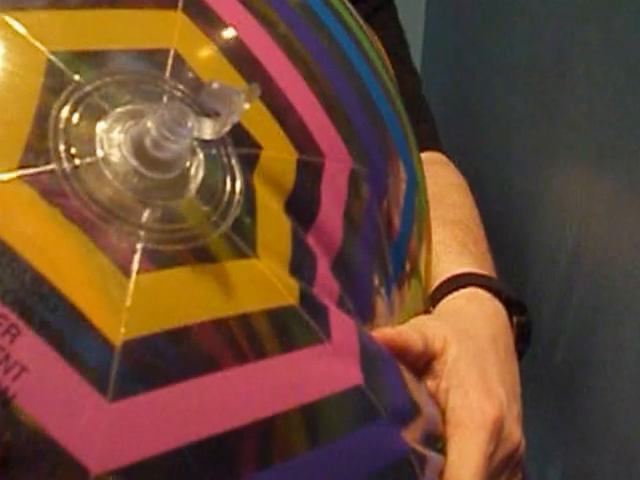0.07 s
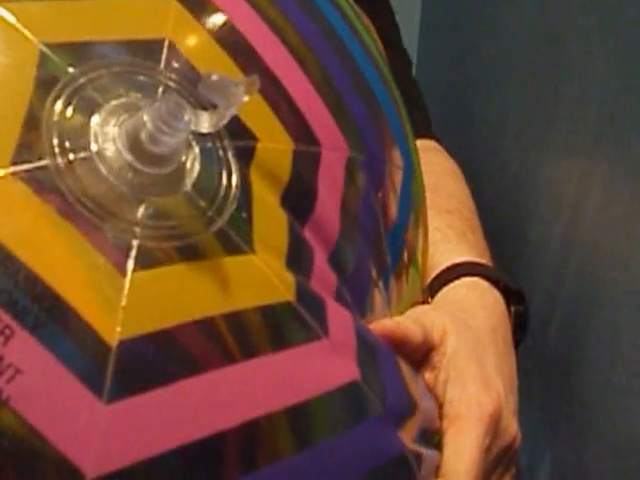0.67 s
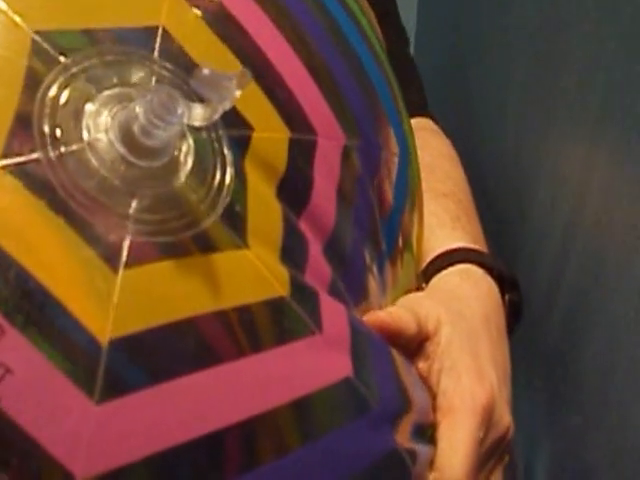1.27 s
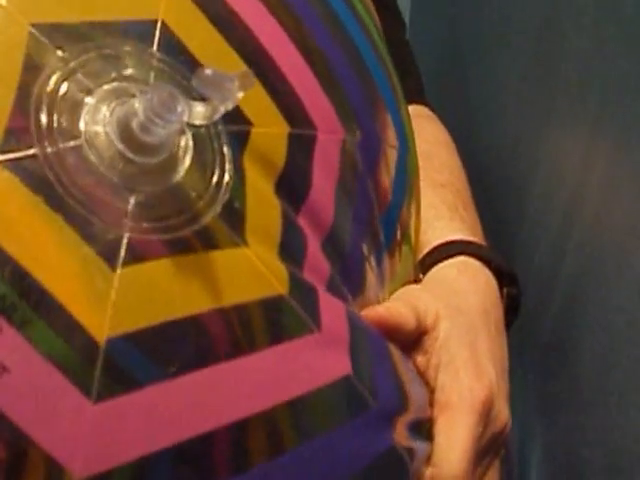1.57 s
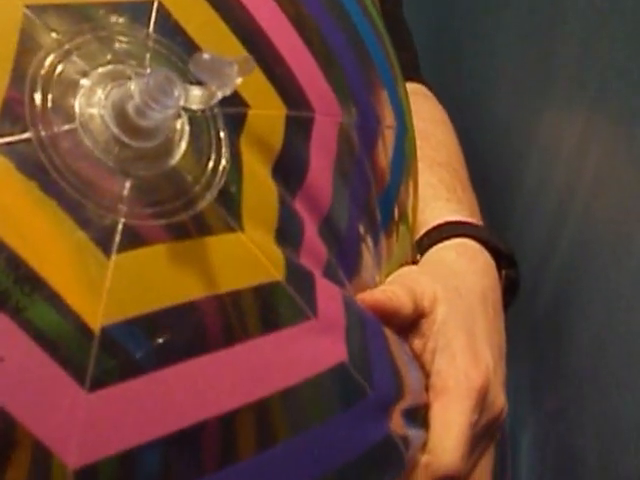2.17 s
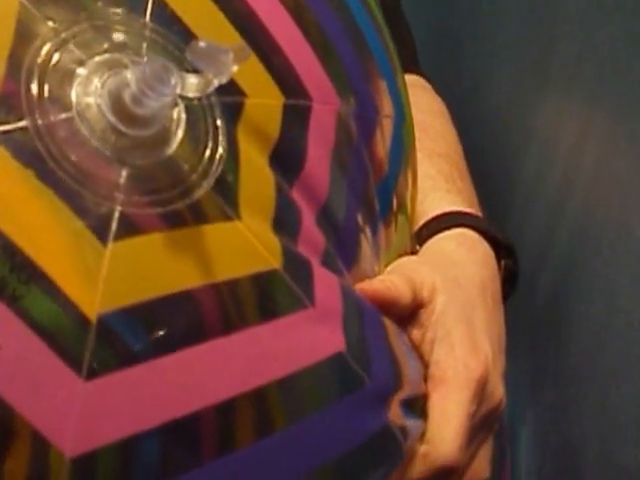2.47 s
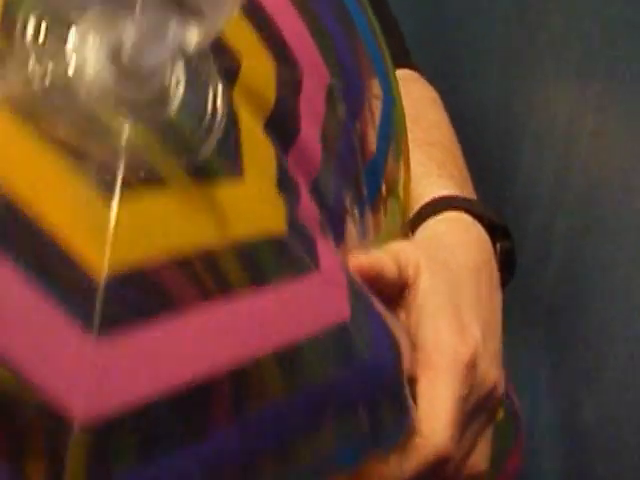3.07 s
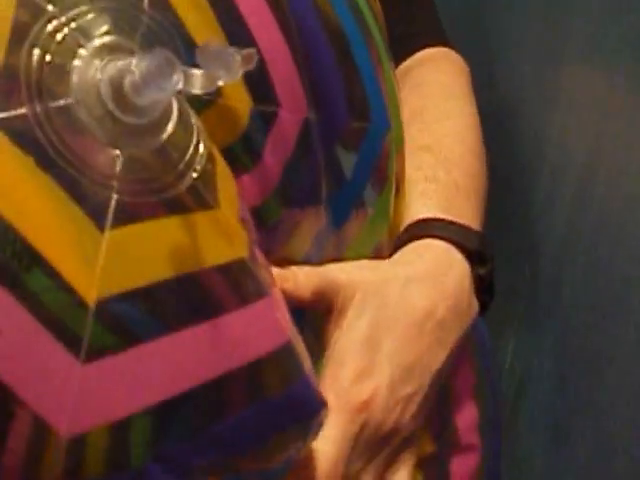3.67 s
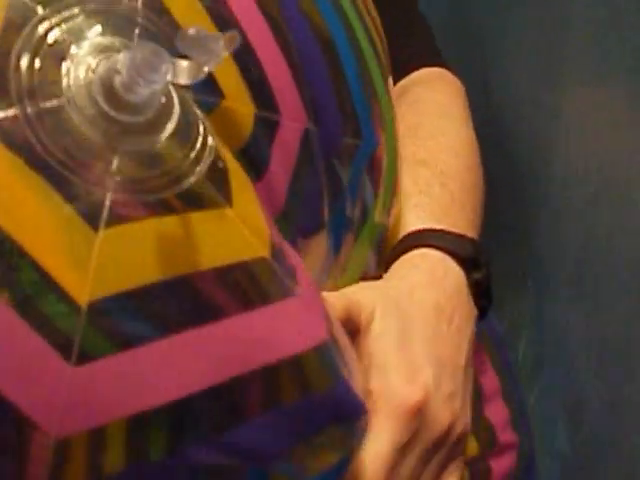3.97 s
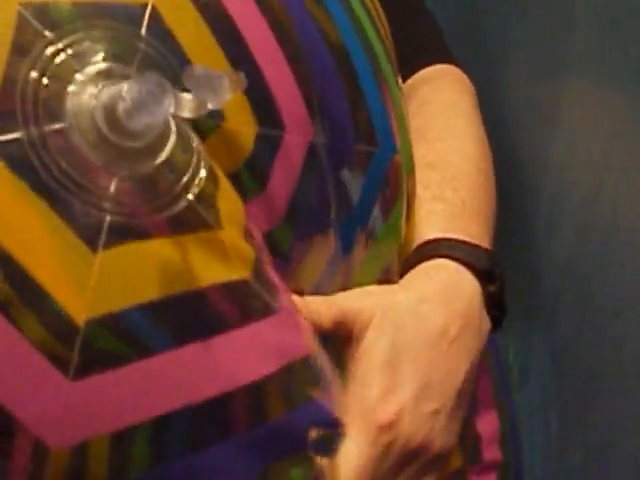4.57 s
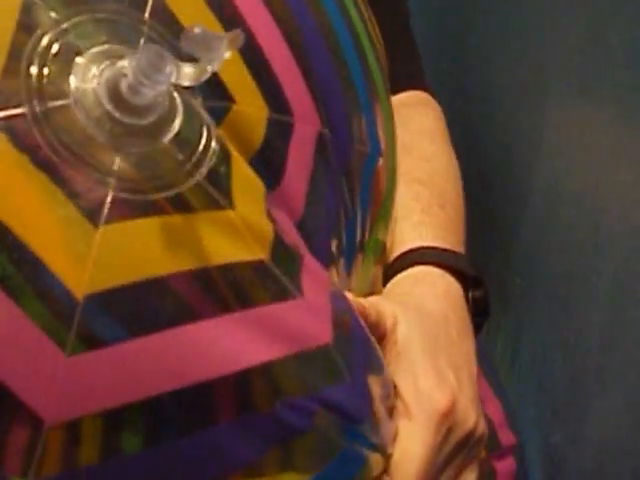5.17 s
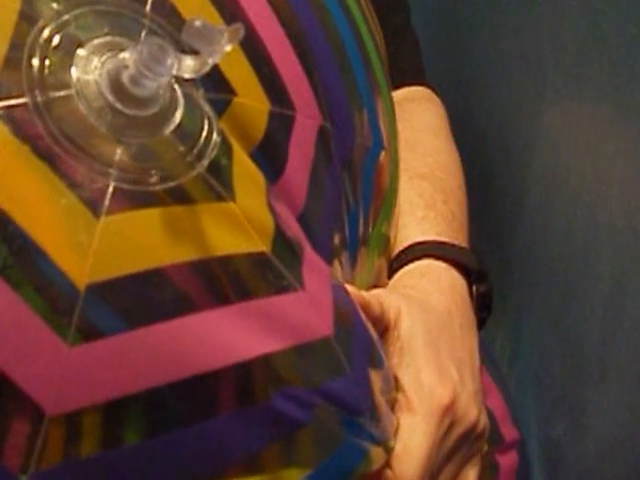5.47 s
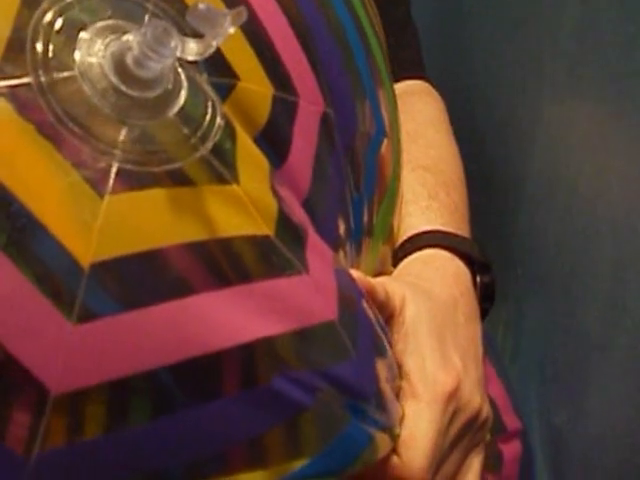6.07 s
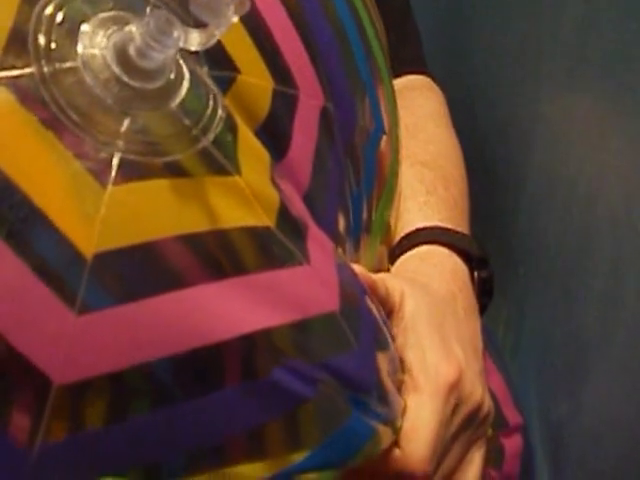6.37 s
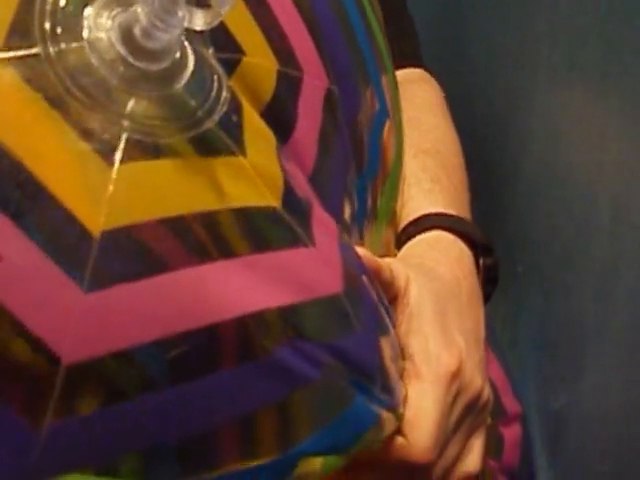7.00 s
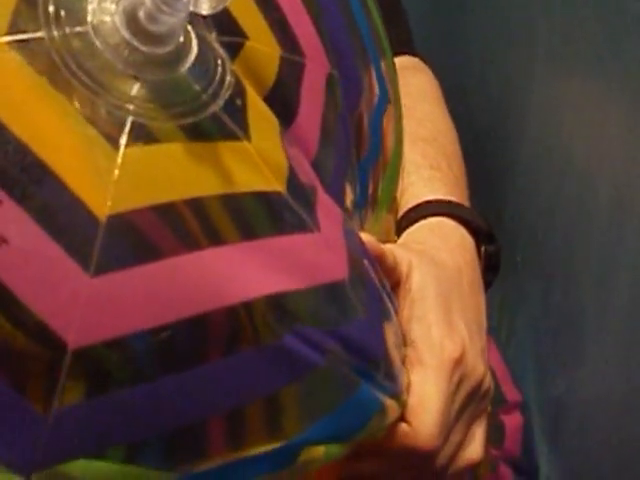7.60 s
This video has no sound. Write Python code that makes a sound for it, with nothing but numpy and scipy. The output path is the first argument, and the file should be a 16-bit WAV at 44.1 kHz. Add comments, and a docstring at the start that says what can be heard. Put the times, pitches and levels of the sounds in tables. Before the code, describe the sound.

A soft hiss leaks from a vinyl ball's valve; hands regrip with hollow thumps and one sharp crack, then it hisses louder.

```python
"""A soft hiss, close up: air leaves the open valve of a vinyl beach ball squeezed by hand in a small room.
It fades as the pressure sinks, over a faint low rumble. Midway the hands take a new grip: palms rub,
the skin buckles with hollow pops that ring in the air inside, and the hiss returns stronger.
All is heard through a narrow-band input, which overloads with a sharp crack on one hard pop."""
import sys
import numpy as np
from scipy import signal
from scipy.fft import rfft, irfft
from scipy.io import wavfile

SR = 44100
rng = np.random.default_rng(int(sys.argv[2]) if len(sys.argv) > 2 else 0)


def pcm_store(signal):
    """Save signal as 16-bit PCM."""
    levels = np.round(np.clip(np.atleast_2d(signal), -1, 1) * 32767)
    wavfile.write(sys.argv[1], SR, levels.astype(np.int16).T)


N = 345744


def from_db(db):
    """Decibels to gain."""
    return 10 ** (np.asarray(db) / 20)


def rms_one(x):
    """Scale to rms 1."""
    return x / np.sqrt(np.mean(x ** 2) + 1e-20)


def cut(x, hz, kind, order=2):
    """Causal Butterworth filter."""
    return signal.sosfilt(signal.butter(order, hz, kind, fs=SR, output="sos"), x + 1e-18)


def add(out, start_s, sound):
    """Mix a sound in at its start time."""
    at = max(round(start_s * SR), 0)
    out[at:at + len(sound)] += sound[:N - at]


def noise(spectrum):
    """Noise shaped by an EQ curve of (Hz, dB) points, rms 1."""
    hz, db = np.transpose(spectrum)
    bins_hz = np.fft.rfftfreq(N, 1 / SR) + 1e-9
    eq = from_db(np.interp(np.log(bins_hz), np.log(hz), db))
    return rms_one(irfft(rfft(rng.standard_normal(N)) * eq, N))


def drift(rate_hz, order=2):
    """A random wobble below the given rate, rms 1."""
    return rms_one(cut(rng.standard_normal(N + SR), rate_hz, "low", order=order)[SR:])


def resonance(x, hz, width_hz):
    """Two-pole band-pass, gain 1 at its centre."""
    radius, angle = np.exp(-np.pi * width_hz / SR), 2 * np.pi * hz / SR
    feedforward = np.array([1, 0, -1]) * (1 - radius ** 2) / 2
    return signal.lfilter(feedforward, [1, -2 * radius * np.cos(angle), radius ** 2], x + 1e-18)


def ring(x, hz, t60_s):
    """A resonator: a unit click sets off a decaying sine of height 1."""
    radius, angle = from_db(-60 / (t60_s * SR)), 2 * np.pi * hz / SR
    return signal.lfilter([0, np.sin(angle)], [1, -2 * radius * np.cos(angle), radius ** 2], x + 1e-18)


# Squeezes of the ball. Each row: start and let-go in seconds, relative jet and valve levels in dB.
SQUEEZE_CUES = [(-0.6, 3.12, -54.5, -49.5), (3.38, 4.8, -44, -44), (4.52, 8, -42, -32)]
# Fingers push or ease, so the valve sings more or less. Each row: centre in seconds, boost or dip in dB.
FINGER_NUDGES = [(0.081, 4), (0.5, -4.5), (1.25, 2), (1.869, 5.5), (2.351, 3), (4.748, -3.5), (5.75, -1.5),
                 (6.969, 3)]

def leak_envelopes(attack_s=.55, sag_db_per_s=2, release_db_per_s=13.5, valve_growth=1.7, nudge_s=.17):
    """Jet and valve envelopes in dB: pressure builds, sags as the ball empties and drops when let go."""
    t = np.arange(N) / SR
    jet = valve = 1e-6
    for start_s, let_go_s, jet_db, valve_db in SQUEEZE_CUES:
        sag_db = sag_db_per_s * np.maximum(t - start_s - attack_s, 0)
        release_db = release_db_per_s * np.maximum(t - let_go_s, 0)
        pressure = np.clip((t - start_s) / attack_s, 0, 1) * from_db(-sag_db - release_db)
        jet = np.hypot(jet, from_db(jet_db) * pressure)
        valve = np.hypot(valve, from_db(valve_db) * pressure ** valve_growth)
    nudge_db = sum(db * np.exp(-((t - centre_s) / nudge_s) ** 2) for centre_s, db in FINGER_NUDGES)
    return 20 * np.log10(jet), 20 * np.log10(valve) + nudge_db


# The tone of the air jet. Each row: frequency in Hz, relative level in dB.
JET_EQ = [(30, 6), (100, -2), (200, 1), (380, 3), (550, 2), (700, 0), (950, 2), (1200, 4.5), (1750, 0.5),
          (2000, -2.5), (2200, -1.1), (3100, -5), (3900, -8.5), (5200, -14)]
# Resonances around the valve that colour the hiss. Each row: centre in Hz, width in Hz, mix level in dB.
HISS_COLOUR = [(150, 35, -2), (305, 60, -6), (435, 60, -3.5), (585, 40, -5), (1070, 60, -3),
               (1225, 50, -3.5), (1385, 60, -9), (1545, 50, -10), (1650, 40, -10)]

def escaping_air(jet_gain_db=7, valve_gain_db=-5, base_hz=1337, hz_per_db=19, half_width_hz=160):
    """A turbulent jet hisses, and the valve stem sings a broad note that rises as it stands out."""
    jet_db, valve_db = leak_envelopes()
    centre_hz = base_hz + hz_per_db * (valve_db - jet_db)
    phase = 2 * np.pi * np.cumsum(centre_hz) / SR
    # turbulence drives the stem with ever-changing strength and phase
    stem = drift(half_width_hz, order=3) * np.cos(phase) + drift(half_width_hz, order=3) * np.sin(phase)
    valve = from_db(valve_db + valve_gain_db) * rms_one(stem)
    jet = from_db(jet_db + jet_gain_db) * noise(JET_EQ)
    flutter_db = .5 * drift(rate_hz=25)
    air = (jet + valve) * from_db(flutter_db)
    return air + sum(from_db(db) * resonance(air, hz, width_hz) for hz, width_hz, db in HISS_COLOUR)


def room(x, wet_db, t60_s=.17, onset_s=.0048):
    """The small room adds a diffuse tail that builds up and dies quickly."""
    t = np.arange(SR // 2) / SR
    fade_in = np.clip(t / onset_s - 1, 0, 1)
    tail = rng.standard_normal(len(t)) * fade_in * from_db(-60 * t / t60_s)
    return x + from_db(wet_db) * signal.fftconvolve(x, tail / np.linalg.norm(tail))[:N]


def rumble(level_db=-69.5, below_hz=130):
    """Room tone: a steady low bed of noise."""
    return from_db(level_db) * drift(below_hz)


# Large folds buckling. Each row: start in seconds, relative level in dB, pitch of the thump in Hz.
FOLD_POPS = [(0.202, -36.5, 105), (3.0391, -31.5, 318), (3.121, -40, 165), (3.198, -41.5, 292),
             (3.277, -39.5, 302), (3.443, -25, 284), (3.56, -20, 365), (3.58, -26.5, 311),
             (3.64, -23.5, 258), (3.7047, -22, 182), (3.733, -29.5, 464), (3.761, -11.5, 400),
             (3.793, -13.5, 70), (3.859, -3.5, 268), (3.8767, -8, 177), (3.938, -23, 215),
             (4.0818, -0.9, 335), (4.103, -9, 420), (4.138, -4.5, 316), (4.137, -23, 140),
             (4.1497, -5.5, 300), (4.171, -3, 363), (4.256, -16.5, 273), (4.3354, -3, 406),
             (4.36, -1.5, 386), (4.4934, -5, 396), (4.517, 0, 272), (4.521, -12.5, 150),
             (4.542, -13.5, 510), (4.555, -12, 85), (4.5624, -3, 310), (4.6191, -6.5, 320),
             (4.627, -6.5, 74.3), (4.691, -4, 316), (4.7794, -2, 168), (4.8914, -10.5, 165),
             (4.9955, -7.5, 352), (5.736, -26, 420), (5.964, -28, 420), (6.014, -26, 170),
             (6.339, -32.5, 64), (6.923, -32.5, 342)]

def buckling(gain_db=-29, taut_hz=340, edge_db=-4.5, edge_db_per_octave=14):
    """A fold flips inward with a damped thump; a tauter fold sounds higher and has a crisper edge."""
    out = np.zeros(N)
    kick = -signal.unit_impulse(SR // 4)
    edge = rms_one(cut(cut(kick, 550, "high", order=1), 1340, "low", order=8))
    for start_s, db, hz in FOLD_POPS + creases():
        swing = resonance(kick, hz, width_hz=55 + .42 * hz)
        thump = rms_one(cut(swing, 1.36 * hz, "low"))
        crisp_db = edge_db + edge_db_per_octave * np.log2(hz / taut_hz)
        coupling_db = 20 * np.log10(min(hz / taut_hz, 1))   # a slack, low fold rings the ball less
        pop = ball_ring(thump + from_db(crisp_db) * edge, coupling_db)
        add(out, start_s, from_db(db + gain_db) * pop)
    return out


# Modes of the air inside the ball. Each row: frequency in Hz, relative level in dB.
CAVITY_MODES = [(160, 8), (238, -5), (310, -23), (405, 1), (525, -3), (660, -17.5), (778, -3.5), (828, 8.5),
                (957, -5), (1070, 6), (1210, -1), (1360, -14.5)]

def ball_ring(pop, coupling_db, send_db=-48, t60_s=.084):
    """The enclosed air adds a hollow ring to a movement of the skin."""
    # each fold sits elsewhere on a ball of changing shape, so the modes vary from pop to pop
    mode_hz, mode_db = np.transpose(CAVITY_MODES)
    mode_hz = mode_hz * rng.normal(1, .01, len(mode_hz))
    mode_db = mode_db + rng.normal(0, 2, len(mode_db))
    ringing = sum(from_db(db) * ring(pop, hz, t60_s) for hz, db in zip(mode_hz, mode_db))
    return pop + from_db(send_db + coupling_db) * ringing


# Reflections off nearby walls and floor. Each row: delay in seconds, gain in dB.
EARLY_REFLECTIONS = [(.0042, 5.5), (.0065, -10.5), (0.011, -10), (.0199, -6.5)]

def walls(x, band_hz=(55, 950)):
    """Dull early echoes; the first is strong as the ball shades the direct path, except in the bass."""
    out = x.copy()
    reflected = cut(x, band_hz, "band", order=1)
    for delay_s, db in EARLY_REFLECTIONS:
        add(out, delay_s, from_db(db) * reflected)
    return out


# The dark tone of palms on vinyl. Each row: frequency in Hz, relative level in dB.
RUB_EQ = [(20, -11.5), (45, 2), (90, -6), (170, -5), (260, -8.5), (450, -9), (700, -14.5), (1300, -33),
          (3000, -40.5)]

def rubbing(grip_rub_db=-34.5, drag_db=-23, lead_s=.0078, release_s=.047):
    """Palms drag on the vinyl in uneven slips, most while the grip changes and around each large pop."""
    t = np.arange(N) / SR
    power = from_db(grip_rub_db + grip_motion_db(t)) ** 2
    for pop_s, pop_db, _ in FOLD_POPS:
        fade = np.maximum((pop_s - t) / lead_s, (t - pop_s) / release_s)
        near = fade < 10
        power[near] += (from_db(pop_db + drag_db) * np.exp(-fade[near])) ** 2
    slips_db = 2.5 * drift(rate_hz=30)
    return np.sqrt(power) * from_db(slips_db) * noise(RUB_EQ)


def grip_motion_db(t, hold_from_s=3.67, hold_to_s=4.72, rise_db_per_s=53, fall_db_per_s=23):
    """The hands take a new grip: their movement swells, holds at 0 dB and fades."""
    return -rise_db_per_s * np.maximum(hold_from_s - t, 0) - fall_db_per_s * np.maximum(t - hold_to_s, 0)


def creases(count=56, from_s=3.2, per_s=30, base_db=-34, spread_db=2, centre_hz=260, spread_octaves=.21):
    """Small creases give way at random while the grip changes; returns rows like those of FOLD_POPS."""
    start_s = from_s + (np.arange(count) + rng.random(count)) / per_s
    softness, pitch = rng.standard_normal((count, 2)).T
    level_db = base_db + grip_motion_db(start_s) - spread_db * softness
    pitch_hz = centre_hz * 2 ** (spread_octaves * pitch)
    return list(zip(start_s, level_db, pitch_hz))


# The overload on one hard pop. Each row: start in seconds, level in dB, pitch in Hz, length in seconds.
OVERLOAD_CUES = [(4.34, -2.5, 3540, 0.00159)]

def overload_crack(band_edge_hz, tick_db=-23):
    """The input overloads: the signal flips up and down a few times, with a faint tick at each end."""
    flips, ticks = np.zeros(N), np.zeros(N)
    for start_s, db, hz, length_s in OVERLOAD_CUES:
        t = np.arange(round(length_s * SR)) / SR
        add(flips, start_s, from_db(db) * (np.cos(2 * np.pi * hz * t) - 1) / 2)
        tick = from_db([db + tick_db])
        add(ticks, start_s, tick)
        add(ticks, start_s + length_s, -tick)
    return cut(flips, band_edge_hz, "low", order=16) + ticks


def scene():
    """The mono mix: hiss and pops with the room's reverb, plus dry rubbing and room tone."""
    hiss = room(escaping_air(), wet_db=-12)
    pops = room(walls(buckling()), wet_db=-9)
    return (hiss + pops + rubbing() + rumble())[None]


def record(dry):
    """A narrow-band input clips peaks near full scale, cuts the treble steeply and cracks once."""
    band_edge_hz = 4166
    clipped = np.clip(dry, -.95, .95)
    narrow = cut(clipped, band_edge_hz, "low", order=16)
    return cut(narrow + overload_crack(band_edge_hz), 15600, "low", order=12)


dry = scene()
out = record(dry)
pcm_store(out)
```